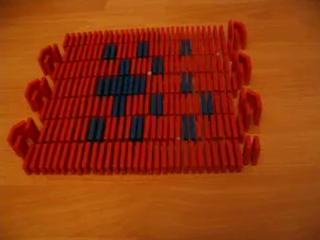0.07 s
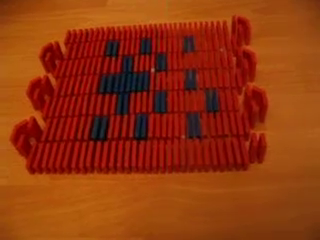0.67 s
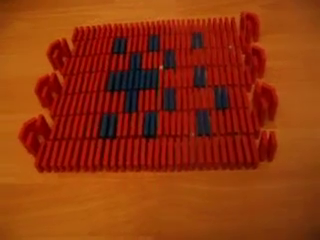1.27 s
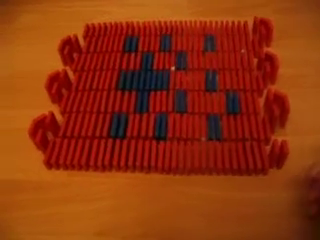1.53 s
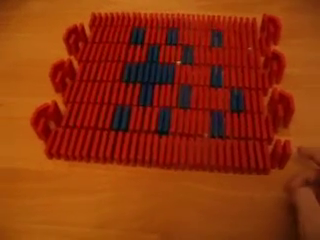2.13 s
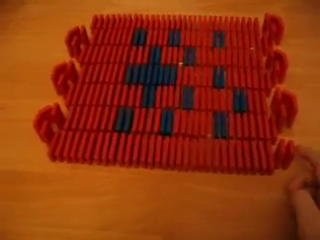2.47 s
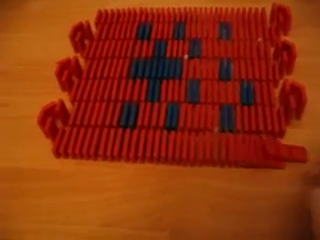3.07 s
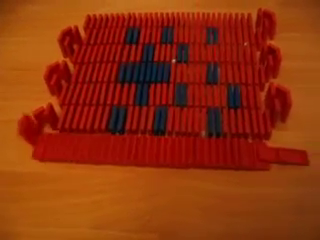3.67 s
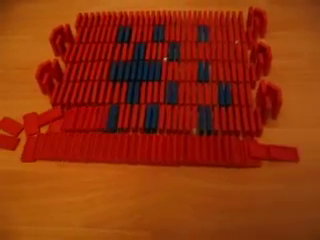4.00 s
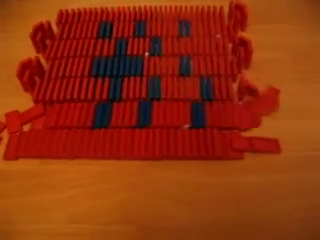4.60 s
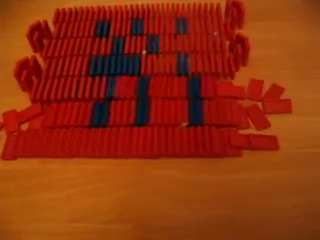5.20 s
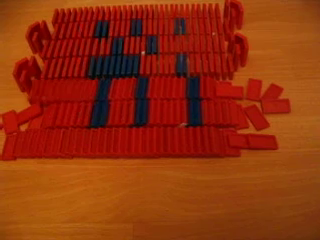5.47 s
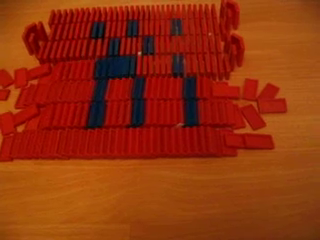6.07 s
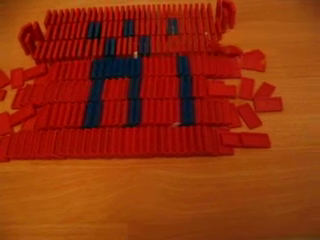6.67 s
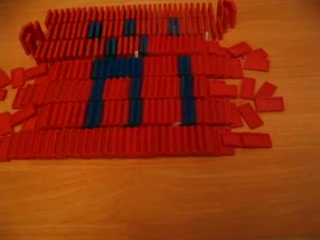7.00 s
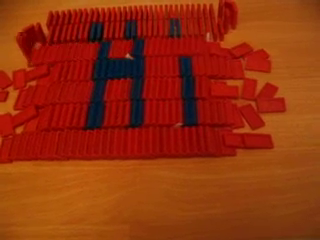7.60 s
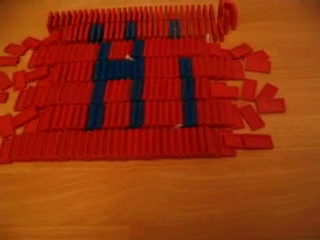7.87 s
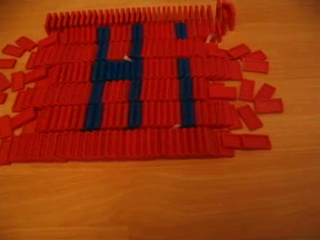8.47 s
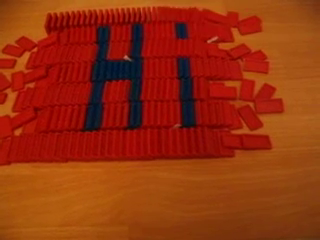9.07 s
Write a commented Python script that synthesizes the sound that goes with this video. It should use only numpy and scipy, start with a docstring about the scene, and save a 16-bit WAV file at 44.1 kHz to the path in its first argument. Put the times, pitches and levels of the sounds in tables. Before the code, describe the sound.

In the first second, fingers rub and bump the microphone's casing with a few light, creaking knocks. Faint hiss, low rumble and a hum follow, the hum swelling briefly near 2 seconds. At about 3 seconds a sharp, loud crack starts a row of small plastic dominoes toppling on a wooden table in a rapid, bright clatter. Six runs follow one another, each lasting a little over half a second, the later ones starting softly and gathering force. After each, a small stack crashes with a crack and a light thump, at roughly 3.8, 4.7, 5.8, 6.7, 7.8 and 8.8 seconds, and loose tiles rattle, slide and knock on the wood. A last short, softer flurry comes at about 9.3 seconds and settles. The sound is mono, with a sharp treble ring and no airy top.

```python
"""On a wooden table, rows of small plastic dominoes topple after fingers rub and bump a camera's shell.
Each impact excites damped normal modes: tile clacks on tile in a travelling front, fallen tiles rattle,
slide and drum on the board, and a stack crashes down at the end of every row but the last.
A small mono microphone with a sharp treble resonance and no top hears it over hiss, hum and hand rumble."""
import sys
import numpy as np
from scipy import signal
from scipy.fft import rfft, irfft
from scipy.io import wavfile
from scipy.ndimage import uniform_filter1d

SR = 44100
rng = np.random.default_rng(int(sys.argv[2]) if len(sys.argv) > 2 else 0)


def master_out(mix):
    """Clip the mix to full scale and print it as 16-bit PCM to the path in sys.argv[1]."""
    frames = np.transpose(np.atleast_2d(mix))
    ceiling = np.clip(frames, -1, 1)
    pcm = np.round(ceiling * 32767).astype(np.int16)
    wavfile.write(sys.argv[1], SR, pcm)


N = 411894
TIME = np.arange(N) / SR
ONSET_S, ROOM_T60_S = .07, 0.24


def from_db(db):
    """Amplitude ratio of a level in decibels."""
    return 10 ** (np.asarray(db) / 20)


def unit_rms(x):
    """Normalisation to unit mean power."""
    return x / np.sqrt(np.mean(x ** 2) + 1e-20)


def at_level(sound, db, size=220):
    """Energy normalisation: db is the rms level if all the energy came within 5 ms."""
    return from_db(db) * sound / np.sqrt(np.sum(sound ** 2) / size + 1e-20)


def at_peak(sound, db):
    """Peak normalisation."""
    return from_db(db) * sound / np.abs(sound).max()


def add(track, s, sound):
    """Linear superposition of a sound starting at time s."""
    i = max(int(s * SR), 0)
    track[i:i + len(sound)] += sound[:max(N - i, 0)]


def lowpass(x, hz, order=2):
    """Maximally flat low-pass filter."""
    return signal.sosfilt(signal.butter(order, hz, fs=SR, output="sos"), x)


def resonate(x, hz, width_hz):
    """A driven, damped oscillator with unit gain at resonance."""
    r = np.exp(-np.pi * width_hz / SR)
    feedback = [1, -2 * r * np.cos(2 * np.pi * hz / SR), r * r]
    return signal.lfilter(np.array([1, 0, -1]) * (1 - r * r) / 2, feedback, x + 1e-18)


def body(x, modes):
    """Modal superposition: parallel resonances with alternating signs."""
    return sum((-1) ** k * from_db(db) * resonate(x, hz, width)
               for k, (hz, width, db) in enumerate(modes))


def noise(spectrum):
    """Spectral shaping of white noise, to unit rms."""
    hz, db = np.transpose(spectrum)
    bins = np.maximum(np.fft.rfftfreq(N, 1 / SR), 1)
    gain = from_db(np.interp(np.log(bins), np.log(hz), db))
    return unit_rms(irfft(rfft(rng.standard_normal(N)) * gain, N))


def contact(bounce, settle_s, room_db, size=7000, rebounds_per_s=1200):
    """Inelastic impact: an impulse, dwindling rebounds and an exponential reverberant tail."""
    t = np.arange(size) / SR
    rebounds = rng.uniform(-2, 2, size) * (rng.random(size) < rebounds_per_s / SR)
    force = bounce * rebounds * np.exp(-t / settle_s)
    force[0] = 1
    tail = rng.standard_normal(size) * from_db(-60 * t / ROOM_T60_S)
    return force + from_db(room_db) * tail * np.sqrt(np.sum(force ** 2) / np.sum(tail ** 2))


def grains(per_s, spread_db, modes):
    """Shot noise: random impulses excite a body's modes; the running rms is held at 1."""
    sizes = from_db(spread_db * np.minimum(rng.exponential(1, N), 4)) * rng.choice([-1, 1], N)
    sound = body(sizes * (rng.random(N) < per_s / SR), modes)
    return sound / np.sqrt(np.abs(uniform_filter1d(sound ** 2, size=2600)) + 1e-12)


# spectral densities of the hiss and the hand rumble: f/Hz, relative level/dB
HISS_SPECTRUM = [(150, -4), (300, 2), (600, 2), (1050, 1.5), (1550, -3.5), (2400, -2), (3100, -4.5),
                 (5200, -4), (6200, -12.5)]
RUMBLE_SPECTRUM = [(20, -13.5), (35, -8), (50, 4), (68, 5.5), (95, -5), (150, -6.5), (200, -14),
                   (400, -47.5)]


def background(hiss_db=-51, rumble_db=-46.5, hum_db=-56.5, sink_s=0.33):
    """Broadband hiss and hand rumble with a narrowband noise hum; all sink as the first row falls."""
    sunk = 1 - np.exp(-np.maximum(TIME - ROWS[0][0], 0) / sink_s)
    swell_db = 7.9 * np.exp(-((TIME - 1.89) / 0.16) ** 2)   # the hum swells once
    narrowband = unit_rms(resonate(rng.standard_normal(N), hz=240, width_hz=22))
    hum = from_db(hum_db - 8 * sunk + swell_db) * narrowband
    hiss = from_db(hiss_db - 2.5 * sunk) * noise(HISS_SPECTRUM)
    rumble = from_db(rumble_db - 7 * sunk) * noise(RUMBLE_SPECTRUM)
    return (hiss + rumble + hum) * (TIME > ONSET_S)


# modes of the camera shell: f/Hz, bandwidth/Hz, gain/dB
SHELL_MODES = [(416, 150, -7.5), (549, 16, 6.5), (996, 165, 5.5), (1380, 65, 3), (1850, 150, 2),
               (2290, 20, -4.5), (2730, 230, -1.5), (3940, 98, 0), (4470, 1100, -11)]
# a finger slides over the shell: t/s, half duration/s, level/dB, f/Hz
FINGER_RUBS = [(0.095, 0.067, -47.5, 2460), (0.698, 0.015, -45, 3140)]


def finger_rubs(ring_width_hz=600, ring_db=-3):
    """Friction of skin drives the shell's modes with fine impulses; one partial stands out."""
    friction = grains(per_s=3000, spread_db=2.0, modes=SHELL_MODES)
    out = np.zeros(N)
    for s, half_s, db, hz in FINGER_RUBS:
        ring = from_db(ring_db) * unit_rms(resonate(friction, hz, ring_width_hz))
        envelope = from_db(db) * np.exp(-((TIME - s) / half_s) ** 2)
        out += envelope * unit_rms(friction + ring)
    return out * (TIME > ONSET_S)


# fingers knock on the shell: t/s, level/dB, f/Hz
FINGER_BUMPS = [(0.1895, -26.5, 3010), (0.3574, -25, 2800), (0.4612, -24.5, 2160), (0.4698, -26, 3900),
                (0.502, -23.5, 2640), (0.5125, -19.5, 1470), (0.5597, -25, 2100)]


def finger_bumps(ring_width_hz=240):
    """Impulse response of the shell, excited three times in quick succession to a creaking knock."""
    out = np.zeros(N)
    for s, db, hz in FINGER_BUMPS:
        for delay_s, part_db in [(-.007, -12), (0, 0), (.004, -11.5)]:   # graze, bump, rebound
            force = contact(bounce=0.58, settle_s=0.0033, room_db=-21.0)
            shell = at_level(body(force, SHELL_MODES), 0)
            ring = at_level(resonate(force, hz, ring_width_hz), 0)
            add(out, s + delay_s, at_level(shell + ring, db + part_db))
    return out


# modes of a plastic tile: f/Hz, bandwidth/Hz, gain/dB
TILE_MODES = [(1980, 220, -9), (2862, 665, -1.5), (4200, 1440, -1), (5200, 230, -37.5)]
MAIN_HZ, MAIN_WIDTH_HZ, MAIN_DB = 4580, 169, 10.16   # the resonance that every tile excites


def struck_tile(force, scatter_db=1.5, detune=0.023):
    """Modal response varies with the point of impact: each mode takes a random pitch and strength."""
    chance = np.clip(rng.standard_normal((len(TILE_MODES), 2)), -2, 2)
    modes = [(hz * (1 + detune * sharp), width, db + scatter_db * strong)
             for (hz, width, db), (sharp, strong) in zip(TILE_MODES, chance)]
    return body(force, modes)


def surge(s, surge_s, rise_s=0.043):
    """Sigmoid growth from 0 to 1 as the toppling front gathers force."""
    return (1 + np.tanh((s - surge_s) / rise_s)) / 2


# toppling fronts: start t/s, surge t/s, end t/s, then relative level/dB of the clacks before the surge,
# the clacks after it, the final rattle, the first drumming, the final drumming
ROWS = [(3.03, 3.03, 3.644, -21.5, -14, -32, -40.5, -40),
        (4.019, 4.23, 4.594, -15.5, -15, -29.5, -49, -40.5),
        (4.977, 5.24, 5.566, -29, -14, -27.5, -60.5, -37), (6.032, 6.33, 6.53, -18.5, -15, -32, -62, -42.5),
        (7.051, 7.37, 7.595, -24.5, -14, -27.5, -53.5, -38.5),
        (8.079, 8.30, 8.594, -21.5, -18, -28.5, -53.5, -39.5),
        (9.267, 9.30, 9.34, -45, -21, -30.5, -66, -46.5)]


def front_strikes(slow_step_s=.027, fast_step_s=.02, face_hz=4455, edge_hz=3390, edge_share=.08):
    """A chain reaction, faster and louder after its surge, links the hard clacks: t/s, level/dB, f/Hz."""
    strikes = []
    for start, surge_s, end, soft_db, full_db, *_ in ROWS:
        marks = [start] + [s for s, *_ in HARD_CLACKS if start < s < end] + [end]
        for a, b in zip(marks, marks[1:]):
            step_s = slow_step_s + (fast_step_s - slow_step_s) * surge((a + b) / 2, surge_s)
            steps = int(round((b - a) / step_s))
            for s in np.linspace(a, b, steps + 1)[1:-1]:
                late, strong, sharp = np.clip(rng.standard_normal(3), -2, 2)
                hz = edge_hz if rng.random() < edge_share else face_hz   # edge-on hits ring lower
                db = soft_db + (full_db - soft_db) * surge(s, surge_s)
                strikes.append((s + .0015 * late, db + 2.5 * strong, hz + 141 * sharp))
    return strikes


# resonances of the board, and of tiles sliding on it: f/Hz, bandwidth/Hz, gain/dB
BOARD_MODES = [(140, 11, -1.5), (255, 230, 0.5), (377, 123, 13), (469, 130, -7.5)]
SLIDE_MODES = [(757, 425, 2), (1042, 420, 5.5), (1296, 760, -1)]
# strikes that stand out from the clatter: t/s, relative level/dB, ring f/Hz
HARD_CLACKS = [(2.9234, -25, 4570), (3.018, -26, 4520), (3.0823, -9, 4540), (3.1031, -10, 4360),
               (3.1547, -8, 4630), (3.2128, -13, 4380), (3.2512, -18, 4580), (3.3286, -13.5, 4570),
               (3.3661, -13.5, 4430), (3.4121, -11.5, 4680), (3.456, -13, 4820), (3.495, -14.5, 4500),
               (3.561, -10, 4570), (3.5807, -9.5, 4590), (3.8233, -15, 4490), (3.8918, -12.5, 4610),
               (4.0462, -13, 4740), (4.0966, -13, 4320), (4.1524, -11.5, 4440), (4.2054, -16, 4520),
               (4.2454, -13.5, 4400), (4.2974, -13.5, 4630), (4.323, -13, 3250), (4.3889, -14, 4430),
               (4.4536, -10, 4370), (4.4923, -10, 4600), (4.735, -16, 4410), (4.8421, -12, 4640),
               (5.006, -21.5, 4400), (5.0501, -23.5, 4470), (5.1074, -21, 4500), (5.1746, -18, 4400),
               (5.222, -12, 4430), (5.2777, -14, 4570), (5.2992, -11, 4480), (5.3419, -8.5, 4570),
               (5.4266, -12.5, 4566), (5.4969, -15, 4410), (5.5668, -10, 4660), (5.835, -19, 4600),
               (5.9665, -14, 4500), (6.0521, -22.5, 4620), (6.2697, -17.5, 4550), (6.3131, -18, 4440),
               (6.3612, -12.5, 4523), (6.4023, -13.5, 4520), (6.4733, -12, 4650), (6.5095, -10.5, 4510),
               (6.6298, -20.5, 2940), (6.7134, -16, 4530), (6.8329, -11.5, 4500), (7.0526, -22.5, 4470),
               (7.0872, -24, 4505), (7.1278, -23, 4340), (7.1627, -24, 4590), (7.2674, -19.5, 4560),
               (7.3057, -15.5, 4410), (7.3808, -11, 4580), (7.418, -10, 4624), (7.4772, -13.5, 4560),
               (7.5479, -11, 4614), (7.5946, -11, 4700), (7.9605, -13, 4740), (8.2234, -18.5, 4528),
               (8.2662, -15.5, 4633), (8.3465, -14, 4610), (8.4511, -16, 4370), (8.5483, -8, 4570),
               (8.5946, -13.5, 4470), (9.2692, -25.5, 4280), (9.312, -19.5, 4390)]


def clacks(softness_hz=800, crest_db=7.5):
    """Free vibration after impact: a tile snaps, rings and couples through its foot to the board."""
    out = np.zeros(N)
    for s, db, hz in list(HARD_CLACKS) + front_strikes():
        force = contact(bounce=0.7, settle_s=0.0044, room_db=-11.5)
        width_hz = 105 + 0.44 * abs(hz - MAIN_HZ)   # damping is least at the main resonance
        ring = resonate(force, hz, width_hz)
        ring = resonate(ring, hz, softness_hz)   # a soft contact rounds the attack
        ping = resonate(force, MAIN_HZ + MAIN_WIDTH_HZ * rng.uniform(-.5, 0.4), width_hz=22)
        plastic = at_level(struck_tile(force), 0) + at_level(ring, 8) + at_level(ping, -11)
        wood = at_level(body(force, BOARD_MODES), -19) + at_level(body(force, SLIDE_MODES), -18)
        add(out, s, from_db(db - crest_db) * (at_level(plastic, 0) + wood))
    return out


def fade_db(start, end, fall_db_per_s, rise_db_per_s=405):
    """Exponential growth up to start and decay after end, as straight slopes in decibels."""
    return -rise_db_per_s * np.maximum(start - TIME, 0) - fall_db_per_s * np.maximum(TIME - end, 0)


# crashed stacks spill their tiles: peak t/s, then relative level/dB of rattle, drumming, sliding
SPILLS = [(3.94, -28, -51, -44), (4.84, -26.5, -57, -44.5), (5.89, -31.5, -51.5, -45.5),
          (6.84, -26, -42.5, -43.5), (7.961, -31.5, -48.5, -44.5), (8.96, -32, -59, -48.5)]


def settling_gains(slide_db=-43.5, slide_hold_s=0.077):
    """Incoherent sources add in power: envelopes of rattle, drumming and sliding for rows and spills."""
    power = np.zeros((3, N))
    for start, surge_s, end, soft_db, full_db, rattle_db, first_drum_db, last_drum_db in ROWS:
        force_db = (soft_db - full_db) * (1 - surge(TIME, surge_s))
        pile_db = np.interp(TIME, [start, end], [first_drum_db - last_drum_db, 0])   # tiles pile up
        rattle = rattle_db + 1.2 * force_db + fade_db(start, end, fall_db_per_s=59.5)
        drum = last_drum_db + pile_db + fade_db(start, end, fall_db_per_s=40.5)
        slide = slide_db + 0.66 * pile_db + fade_db(start, end + slide_hold_s, fall_db_per_s=41)
        power += from_db([rattle, drum, slide]) ** 2
    for s, *levels_db in SPILLS:
        swell = from_db(fade_db(s, s, fall_db_per_s=65.5, rise_db_per_s=70))
        power += np.outer(from_db(levels_db), swell) ** 2
    return np.sqrt(power)


def settling(clump_hz=22.2):
    """Amplitude-modulated shot noise: fallen tiles rattle, drum and slide in fits and starts."""
    rattle_gain, drum_gain, slide_gain = settling_gains()
    clumps = np.clip(unit_rms(lowpass(rng.standard_normal(N), clump_hz)), -2, 2)
    rattle_modes = sorted(TILE_MODES + [(MAIN_HZ, MAIN_WIDTH_HZ, MAIN_DB)])
    rattle = from_db(2.5 * clumps - 2) * grains(per_s=1600, spread_db=3.0, modes=rattle_modes)
    drum = from_db(2.0 * clumps - 1) * grains(per_s=450, spread_db=2.0, modes=BOARD_MODES)
    slide = grains(per_s=1000, spread_db=1.5, modes=SLIDE_MODES)
    return rattle_gain * rattle + drum_gain * drum + slide_gain * slide


# the hardest hits, the first push and then the stacks at the rows' ends:
# t/s, crack peak level/dB, crack f/Hz, thump peak level/dB, ring relative level/dB, ring f/Hz
CRASHES = [(3.0652, 1, 3810, -34, -31.5, 4130), (3.843, -8, 3770, -15, -44, 4460),
           (4.7025, -10.5, 2600, -13, -23.5, 4580), (5.7642, -5.5, 4100, -16, -24, 4800),
           (6.6708, -4.5, 3370, -19.5, -42, 4670), (7.8198, -12, 3470, -18, -29.5, 4230),
           (8.8239, -10.5, 3660, -20.5, -26, 3210)]


def crashes(thump_hz=1000, crack_width_hz=2000, ring_width_hz=130):
    """Bandwidth sets decay time: a brief broad crack, a thump of the board, a longer plastic ring."""
    out = np.zeros(N)
    for s, crack_db, crack_hz, thump_db, ring_db, ring_hz in CRASHES:
        force = contact(bounce=0.33, settle_s=0.005, room_db=-18.5)
        crack = resonate(resonate(force, crack_hz, crack_width_hz), crack_hz, 2 * crack_width_hz)
        thump = lowpass(force, thump_hz)
        ring = resonate(force, ring_hz, ring_width_hz)
        add(out, s, at_peak(crack, crack_db) - at_peak(thump, thump_db) + at_level(ring, ring_db + 3))
    return out


def bias_jolts(step=0.043, drain_s=0.93):
    """Exponential relaxation: each crash offsets the microphone's bias, which drains slowly."""
    out = np.zeros(N)
    for s, *_ in CRASHES:
        add(out, s, step * np.exp(-TIME / drain_s))
    return out


# loose tiles land on the board: t/s, relative level/dB, f/Hz
LANDINGS = [(3.6278, -33.5, 875), (3.6894, -32, 253), (3.715, -34.5, 218), (3.800, -34, 794),
            (3.890, -36, 883), (3.944, -37, 185), (4.051, -36, 1090), (4.774, -36, 205), (4.843, -38, 392),
            (5.571, -38, 447), (5.6157, -33, 915), (5.834, -33, 606), (5.972, -32.5, 1186),
            (6.554, -35, 900), (6.673, -29.5, 720), (6.762, -35.5, 830), (6.820, -34.5, 717),
            (7.6346, -33, 337), (7.698, -33.5, 356), (8.664, -30, 868), (8.701, -35, 690)]


def landings(tick_db=-5, loss_factor=0.49):
    """Heavily damped resonance: a tile falls flat with a short wooden knock and a plastic tick."""
    out = np.zeros(N)
    for s, db, hz in LANDINGS:
        force = contact(bounce=0.58, settle_s=0.0049, room_db=-12.5)
        knock = at_level(resonate(force, hz, loss_factor * hz), 0)
        tick = at_level(body(force, TILE_MODES), tick_db)
        add(out, s, from_db(db + 2) * (knock + tick))
    return out


def scene():
    """Superposition of background, handling and dominoes in one channel."""
    handling = background() + finger_bumps() + finger_rubs()
    tiles = settling() + landings() + crashes() + clacks()
    return (tiles + handling + bias_jolts())[None]


def record(dry):
    """Band limiting, then clipping: the loudest crack overloads and spreads above the band edge."""
    roll_off_hz, band_edge_hz, cutoff_hz, overload = 5200, 6500, 16500, .74
    dull = lowpass(dry, roll_off_hz, order=8)
    narrow = signal.sosfilt(signal.cheby2(16, 60, band_edge_hz, fs=SR, output="sos"), dull)
    clipped = np.clip(narrow, -overload, overload)
    return signal.sosfilt(signal.cheby2(12, 70, cutoff_hz, fs=SR, output="sos"), clipped)


dry = scene()
out = record(dry)
master_out(out)
```